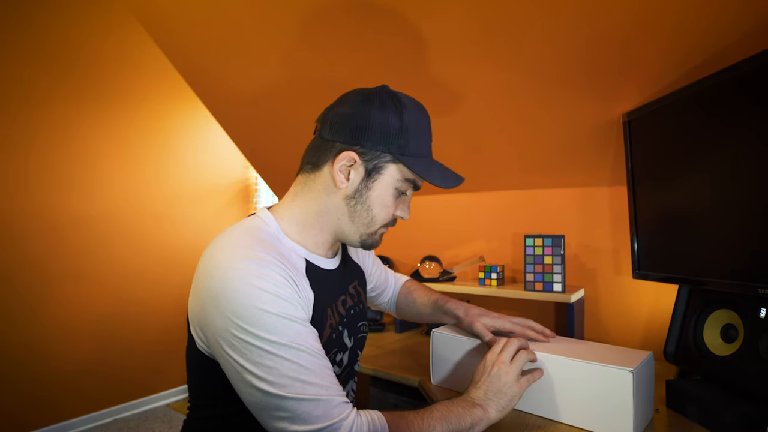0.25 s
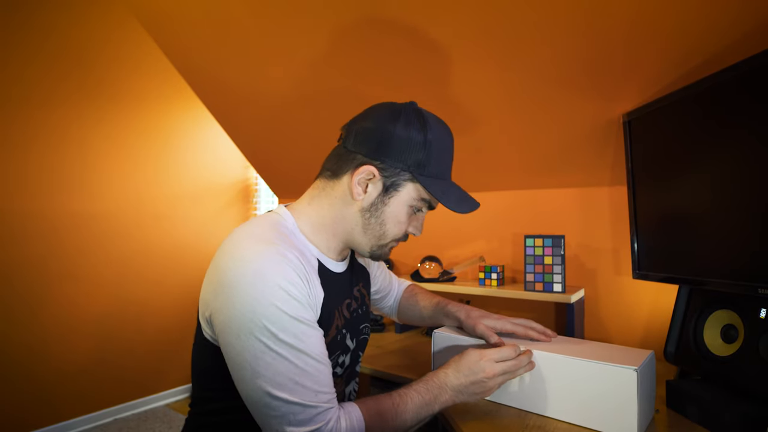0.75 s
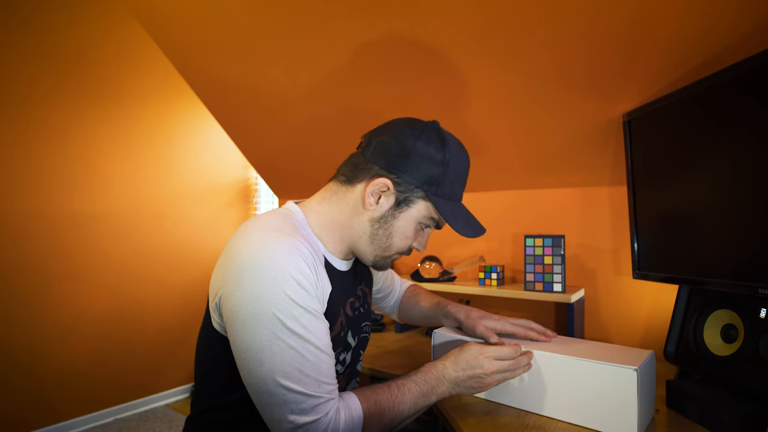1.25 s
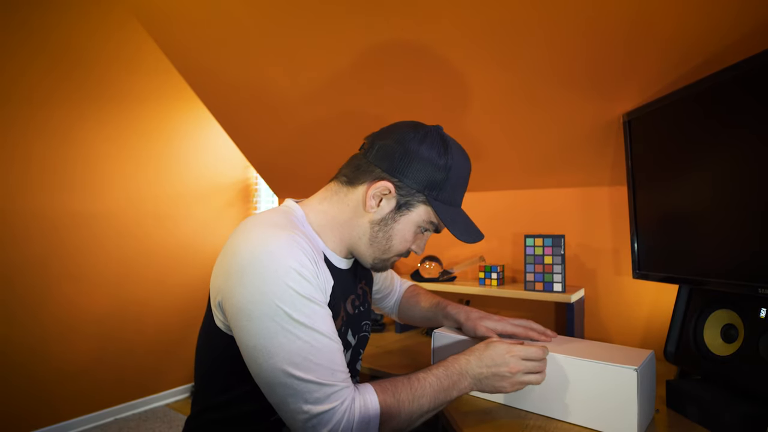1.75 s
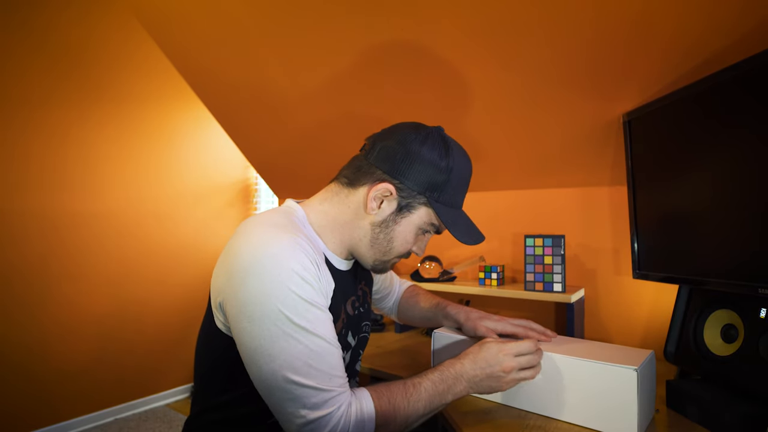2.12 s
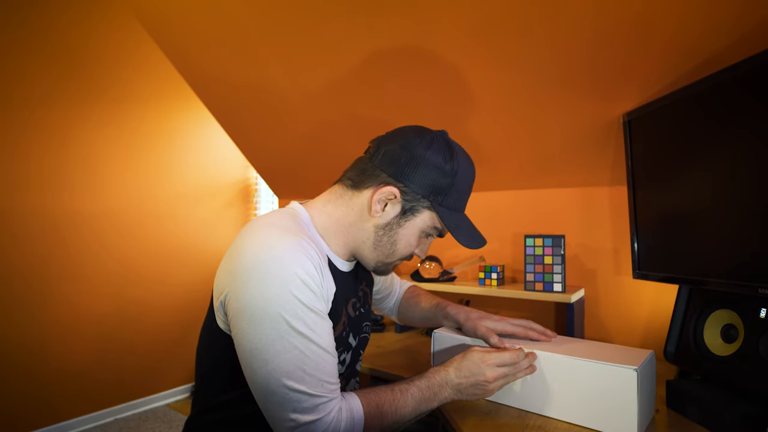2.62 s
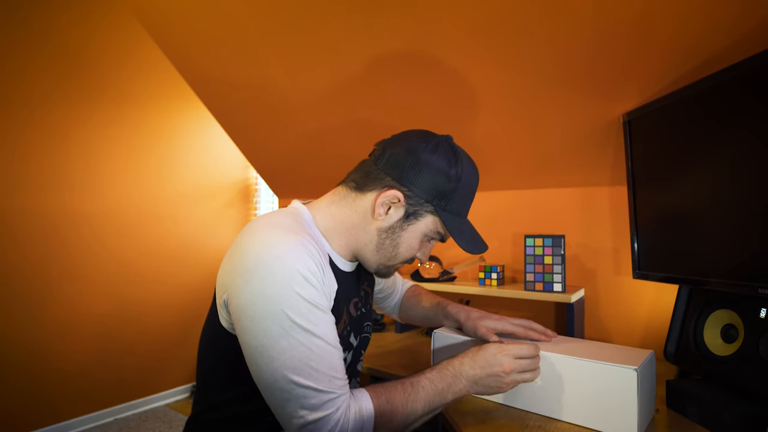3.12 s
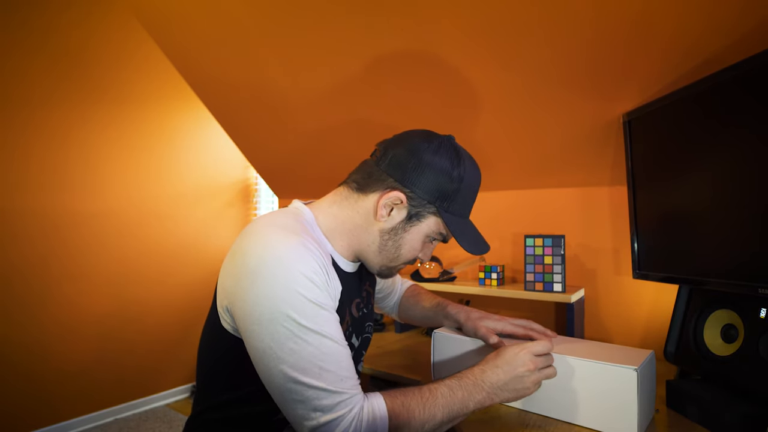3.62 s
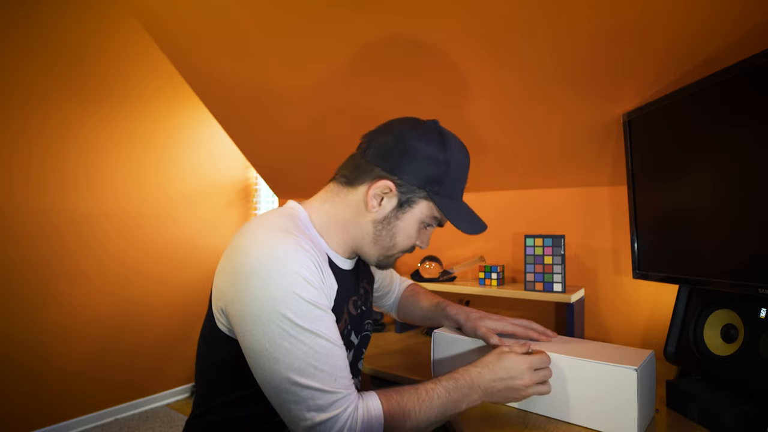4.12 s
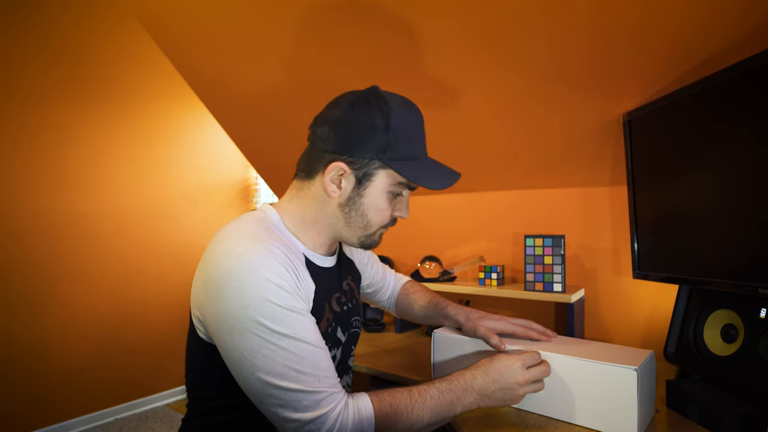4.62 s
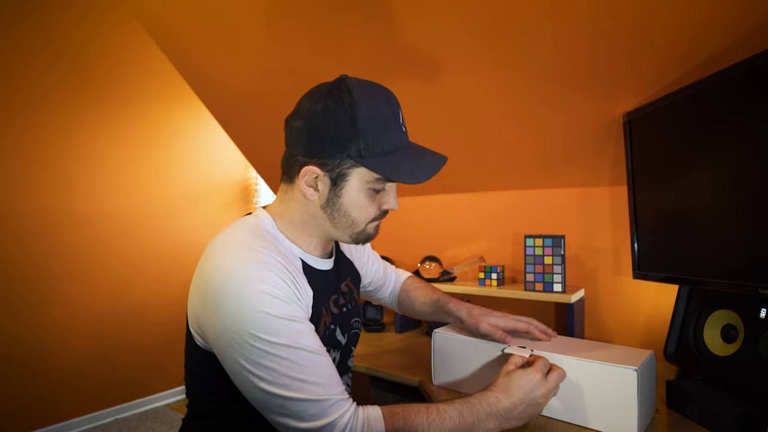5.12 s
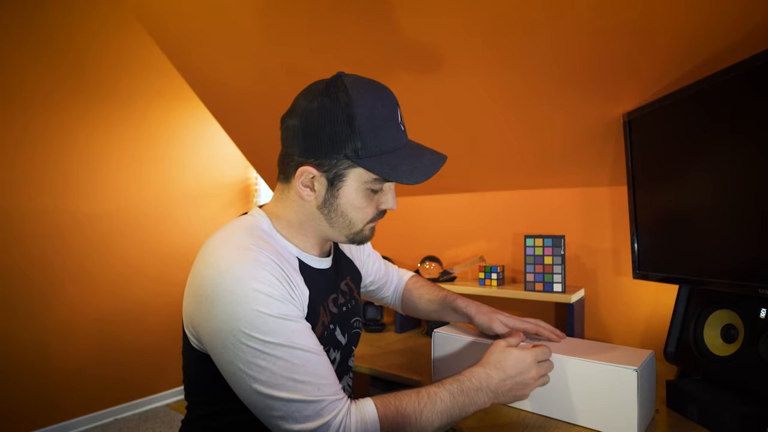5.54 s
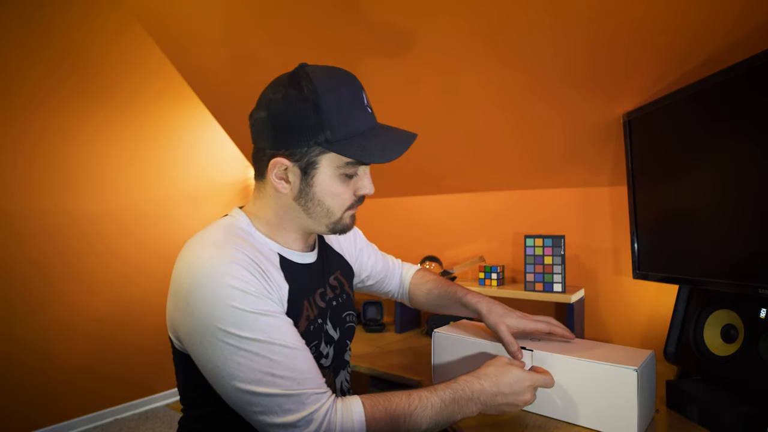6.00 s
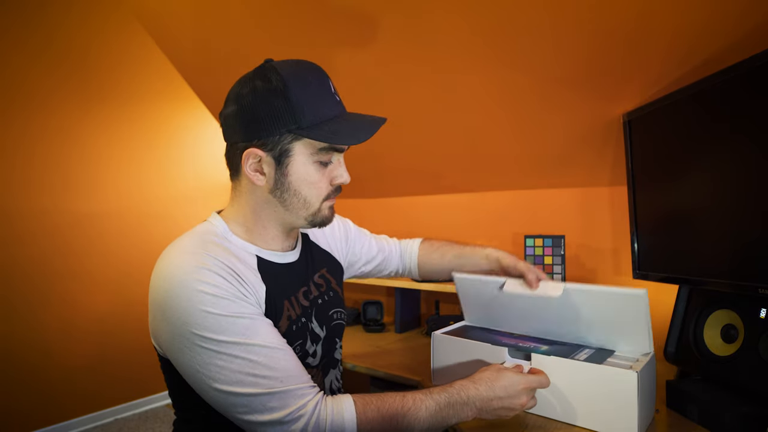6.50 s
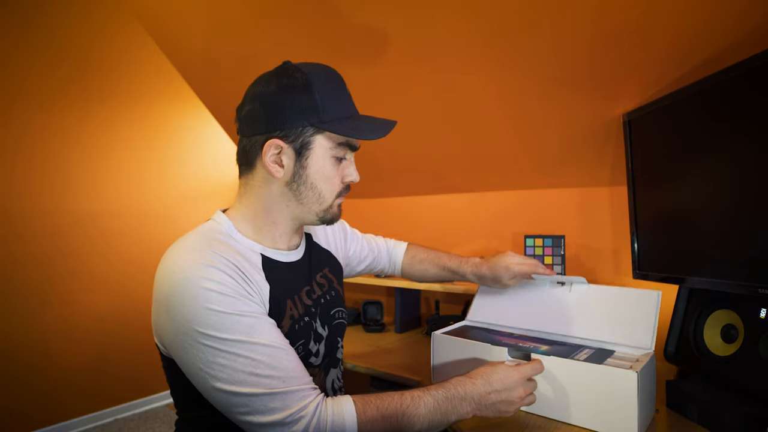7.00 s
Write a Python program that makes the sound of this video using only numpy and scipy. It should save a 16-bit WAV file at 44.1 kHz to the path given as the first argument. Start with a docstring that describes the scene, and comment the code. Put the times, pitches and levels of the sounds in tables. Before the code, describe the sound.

Fingernails pick and scratch at a cardboard box flap with irregular sharp clicks and knocks, then the lid lifts with papery scrapes in a small room.

```python
"""Fingernails pick at the flap of a cardboard box in a small dry room, then hands pull the tab and lift the lid.
Each contact is a burst of jerks filtered by nail and card (snap) and panel modes (knock), plus a hollow thump.
Dragging fingers hiss on the card and keep the box modes stirring; the box also rocks in low wobbles.
Behind them: echoes from sparse decaying taps, low air noise and steady coloured background noise."""
import sys
import numpy as np
from scipy import signal
from scipy.io import wavfile
from scipy.ndimage import uniform_filter1d

SR = 44100
rng = np.random.default_rng(int(sys.argv[2]) if len(sys.argv) > 2 else 0)


def materialize(psi):
    """Save the field psi as 16-bit PCM at rate SR to the path in sys.argv[1].

    A 1-D psi becomes a single channel; in a 2-D psi each row is a channel.
    """
    bounded = np.clip(np.atleast_2d(psi).T, -1, 1)
    quanta = np.round(bounded * 32767).astype(np.int16)
    wavfile.write(sys.argv[1], SR, quanta)


N = 320329

# Sudden slips: start_s, knock_db, knock_hz (favoured panel pitch), thump_db, snap_db, snap_hz, length_ms
SLIPS = [(0.327, -26, 723, -38.5, -23.5, 5300, 13), (0.352, 2.5, 797, -35.5, -43, 2885, 1.7),
         (0.355, -5, 700, -38, -51, 2880, 1.8), (0.431, 13, 404, -7, 10, 2246, 2),
         (0.502, 1, 644, -28, -6, 3640, 2.9), (0.577, -21, 404, -29, -45, 2630, 2.3),
         (1.271, -18, 1200, -39, -19.5, 5330, 2.65), (1.5885, -5.5, 1130, -38, 7.5, 5300, 2.8),
         (1.634, -15.5, 345, -32.5, -13, 2710, 12), (1.842, -14.5, 645, -59, -15.5, 6850, 14),
         (1.887, -26, 684, -71, -23, 6400, 3.1), (2.044, 13, 500, -53.5, 8.5, 5250, 4.5),
         (2.217, -11.5, 500, -52, -15.5, 4040, 7.9), (2.249, -16, 1010, -39, -22.5, 5670, 7.9),
         (2.274, -8, 1180, -35, -14, 3170, 22), (2.543, -38, 645, -59, -25, 3200, 9.5),
         (2.665, -7.5, 992, -36, -11, 4000, 8.2), (2.769, -7.5, 410, -29, -22.5, 3160, 8.3),
         (3.043, -3, 1130, -34, 10, 3360, 2.6), (3.092, 5.5, 790, -10, 0, 4570, 3.1),
         (3.266, -9.5, 337, -25.5, -26, 5800, 14), (3.384, -14, 1130, -48.5, 3.5, 5150, 4.1),
         (3.62, -22.5, 395, -30.5, -45, 5100, 2), (3.675, -12, 463, -25, -46.5, 5060, 1.6),
         (3.82, 10.5, 1106, -23, 12, 3610, 2.6), (4.035, -8.5, 487, -37, -16, 3620, 6.9),
         (4.142, -39.5, 1190, -48, -17, 3550, 26), (4.149, -47, 1000, -58, -27.5, 11000, 8),
         (4.229, -3.5, 395, -30.5, -16, 3680, 44), (4.462, 1.5, 334, -31, -14, 3610, 20),
         (4.485, 5.5, 550, -41.5, -22, 6000, 4.1), (4.595, -14.5, 620, -32, -8, 4600, 4.6),
         (4.633, -40, 528, -45, -6, 6000, 5), (4.664, -0.5, 1050, -25.5, 2.5, 4670, 6.3),
         (4.6915, 2, 550, -29, 6.5, 4800, 4.5), (4.943, -65, 307, -44.5, -20, 4800, 6.2),
         (5.08, -14, 1170, -51, -29, 3620, 7.1), (5.155, -12.5, 404, -35.5, -35, 3270, 8.9),
         (5.226, -16, 700, -52, -15, 3700, 4), (5.238, -11, 700, -53.5, -17, 4800, 3.5),
         (5.315, 12, 844, -33, 10.5, 3470, 6.6), (5.399, -7, 570, -28.5, -13.5, 2730, 3.6),
         (5.462, -11.5, 1180, -53, -9.5, 3700, 14), (5.572, 0.3, 1130, -24, -4, 3270, 4.5),
         (5.613, -5, 334, -23, -16, 4150, 3.9), (5.642, -5.5, 336, -29, -34.5, 3170, 3.9),
         (5.688, 2.5, 384, -21, -2.5, 4030, 4.4), (6.248, -6, 413, -38.5, -21, 3640, 1.1),
         (6.486, 8, 470, -11, -4, 4560, 2.4), (6.541, -14, 430, -29.5, -17.5, 3530, 3.6),
         (6.785, -17, 249, -46, -27, 3800, 2.2), (6.92, 6, 272, -16.5, -2.5, 2520, 9.3),
         (6.954, -16, 260, -16.5, -11.5, 2500, 6.9), (7.036, -15, 270, -21, -25, 7150, 7.2),
         (7.093, -5.5, 1800, -34, -3, 2460, 19), (7.121, -16, 1920, -31, -28, 4690, 6.6),
         (7.201, -32, 900, -64, -6, 4760, 3.7), (7.243, -3, 725, -25, 3.5, 3560, 7)]
# Short scuffs that swell before letting go: start_s, knock_db, knock_hz, thump_db, snap_db, snap_hz, length_ms
SCUFFS = [(0.131, -24, 336, -26.5, -30, 7600, 9.2), (0.428, 10, 413, -17, 8.5, 2660, 2.2),
          (0.713, -18.5, 623, -36.5, -31, 5420, 6.9), (0.93, -15, 1540, -43.5, -9.5, 4600, 7.6),
          (1.112, -22, 300, -36, -31, 5800, 9.5), (1.382, -25.5, 391, -50, -25.5, 6180, 9.4),
          (2.191, -21, 680, -61.5, -21.5, 5330, 2.9), (3.085, 10, 800, -17.5, 7, 4700, 4),
          (3.336, -14, 1300, -43, -21, 5130, 29), (4.255, 3, 880, -50, -3, 3400, 5),
          (4.493, 2.5, 544, -27, -4, 9000, 2.7), (5.092, -6.5, 1190, -46, -19, 3630, 3.6),
          (5.255, 0, 690, -47, -4.5, 4500, 2.6), (5.482, -14.5, 1200, -54, -12, 3700, 7.7),
          (5.528, -25, 1700, -62, -11.5, 3900, 14), (5.774, 0.5, 960, -27.5, -5.5, 3570, 3.8),
          (5.859, -7, 665, -32, -9, 3300, 25), (6.911, -14, 700, -38, -14, 4000, 3),
          (6.937, -28, 328, -15, -4.5, 6100, 5.2)]
# Even strokes of a finger, equally long: start_s, knock_db, knock_hz, thump_db, snap_db, snap_hz
STROKES = [(0.047, -19.5, 1200, -67, -23, 3780), (0.6, -22, 554, -34.5, -21.5, 7100),
           (1.011, -26, 1490, -62.5, -33.5, 5150), (1.139, -20.5, 1307, -44.5, -24, 5630),
           (2.393, -16, 970, -60, -24, 4570), (2.91, -25, 1300, -61, -36, 2020),
           (3.275, -19, 1350, -47, -32, 5980), (4.275, -51.5, 463, -33, -11.5, 3440),
           (5.18, -46, 500, -53, -10, 4300), (5.984, -41, 751, -57, -9, 8300),
           (6.056, -45.5, 1030, -38, -8, 3700), (6.282, -13, 1500, -40, -17, 5340),
           (6.385, -11.5, 1540, -57, -9, 3530), (6.858, -12.5, 1970, -61.5, -11, 2820),
           (7.082, 1.5, 1740, -42, -5, 3160), (7.194, -34, 762, -40, -1.5, 2570)]
STROKE_MS, SCUFF_ROUND = 45.3, 1.3  # roundness above 1: softer start
# Ring of the nail tip by kind of contact: peak_db, half_width_hz
NAIL_RING = {"slip": (9.24, 450), "scuff": (9.6, 320), "stroke": (11, 280)}
# Modes of the box hollow: mode_hz, relative_level_db, t60_s
HOLLOW_MODES = [(69, -6.5, 0.046), (94, -10.5, 0.12), (150.1, 9, 0.079), (208.7, 1, 0.039)]
# Modes of the card panels: mode_hz, relative_level_db, t60_s
PANEL_MODES = [(235, 6, 0.067), (345, -10.5, 0.2), (430, -6.5, 0.11), (493, -12.5, 0.034),
               (642, 0.5, 0.034), (720, -6, 0.068), (974, -0.5, 0.023), (1130, 2, 0.025),
               (1300, -2.5, 0.017), (1385, -6, 0.091), (1692, -6, 0.084), (2238, -4.5, 0.042)]
# Bright spectrum of card: freq_hz, relative_density_db
CARD_SPECTRUM = [(880, -55), (1500, -9), (1940, -10.5), (2230, -8), (2880, -9), (3220, -6.5), (4640, -7),
                 (5770, -7.5), (10500, -15), (14100, -29), (16000, -39)]
SLIP_SPOT_DB_PER_OCT, RUB_SPOT_DB_PER_OCT, DRAG_SPOT_DB_PER_OCT = 9.5, 16, 20  # fall off favoured pitch
HAND_DAMPING = 0.6  # share of panel t60 left by the hand
LID_UP_S, OPEN_PITCH_RATIO = 6.7, 0.59  # the hollow thumps lower with the lid up

# Drags of fingers: peak_s, swell_s, dying_s, hiss_db, panels_db, hollow_db, fineness_db_per_oct, spot_hz
DRAGS = [(0.15, 0.059, 0.2, -56, -49.5, -47.5, 9.5, 800), (0.426, 0.024, 0.022, -50, -42, -51, -9, 910),
         (0.499, 0.16, 0.16, -64, -45, -34.5, -3, 470), (1.157, 0.15, 0.11, -73, -62, -56, -4, 954),
         (1.277, 0.021, 0.024, -80, -47.5, -37.5, -15, 1300), (1.735, 0.15, 0.13, -60.5, -49, -60, -4, 690),
         (2.035, 0.037, 0.3, -60.5, -53, -61.5, 3.5, 1000), (2.279, 0.15, 0.042, -55.5, -53, -43.5, 1, 800),
         (2.434, 0.074, 0.046, -60.5, -57.5, -45.5, 3, 895),
         (2.696, 0.042, 0.07, -61.5, -67, -44, 2.5, 850), (2.763, 0.039, 0.03, -56, -53, -43, 1, 665),
         (2.933, 0.12, 0.1, -70.5, -60.5, -52, -3, 1280), (3.073, 0.04, 0.14, -51.5, -45.5, -60, -3, 950),
         (3.38, 0.13, 0.88, -77, -62, -76, -5, 1260), (3.911, 0.21, 0.34, -59.5, -51, -64, -3, 970),
         (4.155, 0.026, 0.14, -70, -53, -78, 4, 870), (4.263, 0.072, 0.2, -50.5, -52, -46, -2, 840),
         (4.492, 0.014, 0.057, -38, -33, -38, 5.5, 800), (4.61, 0.05, 0.027, -48.5, -37, -49, 3, 720),
         (4.676, 0.13, 0.12, -44, -47.5, -64, 4, 645), (5.19, 0.073, 0.052, -55, -39.5, -38, -3.5, 490),
         (5.249, 0.045, 0.069, -37, -35.5, -57, -2, 720), (5.39, 0.37, 0.071, -54.5, -52, -44, -6.5, 850),
         (5.5, 0.029, 0.25, -52, -56, -59, -6, 860), (5.607, 0.067, 0.1, -55.5, -38, -60, -6, 765),
         (5.787, 0.091, 0.48, -50.5, -46, -43, -2, 820), (6.088, 0.048, 0.052, -58.5, -73, -43, 4, 657.3),
         (6.331, 0.083, 0.16, -54, -40.5, -58, -3.5, 700), (6.433, 0.072, 0.11, -36.5, -43, -49, -0.2, 590),
         (6.498, 0.028, 0.035, -54, -40, -31, 15.5, 583), (6.6, 0.13, 0.049, -52, -75, -65, 7.5, 542),
         (6.798, 0.048, 0.16, -54.5, -49.5, -57, 9.5, 760), (6.936, 0.14, 0.52, -46, -49.5, -44, 8, 980),
         (7.109, 0.091, 0.14, -42.5, -44, -55, 1.5, 1260), (7.239, 0.039, 0.011, -32, -32.5, -57, 1, 930)]
DRAG_DEPTH_DB, DRAG_ROUND = 20, 1.52  # fall over one swell or dying time; above 1: round top, quick end
# Hands resting and shifting between drags: time_s, hiss_db
REST_HISS = [(0.0, -68), (0.35, -77), (0.66, -90), (0.78, -104), (1.33, -81.5), (1.56, -75), (2.6, -76),
             (3.6, -69.5), (4.3, -76.5), (4.44, -77), (4.5, -52), (4.85, -69), (5.06, -81), (5.9, -69),
             (6.2, -90.5), (6.55, -56), (6.75, -112.5), (6.82, -60), (7.05, -62), (7.26, -56)]
REST_PANELS_DB, REST_HOLLOW_DB = 3.5, 10  # relative to the resting hiss
REST_FINE_DB_PER_OCT, REST_SPOT_HZ = 6.7, 800
HISS_PATCHY_DB, CATCH_DB, WANDER_OCT = 2.4, 2.6, 0.17

# Rocking of the box: start_s, level_db
BUMPS = [(0.445, -13), (0.474, -24), (0.515, -15), (0.576, -30), (0.63, -28.5), (2.046, -18.5),
         (4.257, -24.5), (4.488, -22), (6.485, -22.5), (6.985, -21)]
BUMP_HZ, BUMP_T60_S = 89.5, 0.054
# Decay of the room: freq_hz, t60_s
ROOM_DECAY = [(100, 0.023), (300, 0.2), (800, 0.16), (2000, 0.18), (5000, 0.15), (12000, 0.16)]
ROOM_DB, ECHO_PATTERNS = -10.0, 3
# Air moved by the arms and the lid: time_s, level_db
SWAY_LEVEL = [(0.0, -64.5), (0.46, -37), (0.91, -65), (2.12, -50), (2.2, -59.5), (4.14, -64), (4.29, -45),
              (5.09, -73), (5.22, -53), (6.14, -65.5), (6.399, -51), (6.652, -47), (6.771, -54.5),
              (6.8, -36), (6.9, -35.5), (7.26, -57)]
# Spectrum of the background noise: freq_hz, relative_density_db
BACKGROUND_SPECTRUM = [(15, -40.5), (25, 5), (64, 0.5), (92, -11.5), (463, -19.5), (659, -13), (840, -24),
                       (2910, -23), (3620, -21.5), (3920, -30.5), (4370, -19.5), (5880, -11), (6380, -30.5),
                       (10100, -19.5), (12300, -19.5), (16000, -41.5)]
BACKGROUND_DB = -64.5
EDGE_HZ = 16050


def hands():
    """All slips, scuffs and strokes: the direct sound and the sound sent to the walls."""
    near, far = np.zeros((2, N))
    for rows, kind in (SLIPS, "slip"), (SCUFFS, "scuff"), (STROKES, "stroke"):
        for row in rows:
            start_s, *settings = row
            if kind == "stroke":
                settings.append(STROKE_MS)
            direct, sent = contact(start_s, *settings, kind)
            add(near, start_s + 0.001, direct)
            add(far, start_s + 0.003, sent)
    return near, far


def contact(start_s, knock_db, knock_hz, thump_db, snap_db, snap_hz, length_ms, kind):
    """Uneven jerks drive card and panels; the softer push behind them drives the hollow."""
    jerks = contact_jerks(length_ms, kind)
    snap, wall_snap = nail_snap(snap_db, snap_hz, kind)
    knock = panel_knock(knock_db, knock_hz, kind)
    near = hollow_thump(thump_db, start_s > LID_UP_S)
    far = near.copy()
    add(near, 0, signal.fftconvolve(jerks, knock)[:len(near)])
    add(near, 0, signal.fftconvolve(jerks, snap))
    # except for strokes, one plain tick feeds the echo, giving a smooth tail
    spread = jerks if kind == "stroke" else np.ones(1)
    add(far, 0, signal.fftconvolve(spread, knock)[:6000])
    add(far, 0, signal.fftconvolve(spread, wall_snap))
    return near, far


def contact_jerks(length_ms, kind):
    """Random jerks under an envelope: slips decay, scuffs swell, strokes stay level and stop abruptly."""
    jerk, size = rng.standard_normal((2, 3200))
    t = np.arange(len(jerk)) / SR
    u = t / (max(length_ms, 0.3) / 1000)
    if kind == "slip":
        shape = np.minimum(t / 0.00019, 1) * np.exp(-u ** 1.3)
    elif kind == "scuff":
        shape = (u * np.exp(1 - u)) ** SCUFF_ROUND
    else:
        shape = np.minimum(t / 0.0061, 1) * np.exp(-u ** 8)
    jerks = jerk * gain_of(size) * shape
    if kind == "slip":  # the first release is the firmest
        jerks += 1.22 * np.exp(-((t - 0.0006) / 0.0001) ** 2)
    return jerks / np.linalg.norm(jerks)


def nail_snap(snap_db, snap_hz, kind):
    """Card spectrum with a nail resonance, aimed forward so the walls hear less of the ring."""
    hz = np.fft.rfftfreq(1024, 1 / SR)
    peak_db, half_width_hz = NAIL_RING[kind]
    nail_db = peak_db - 10 * np.log10(1 + ((hz - snap_hz) / half_width_hz) ** 2)
    nail_db = np.maximum(nail_db, 0)
    tilt_db_per_oct = 3.2 * np.log2(snap_hz / 4200)  # thinner edges are brighter
    card_db = read(CARD_SPECTRUM, hz) + tilt_db_per_oct * np.log2((hz + 500) / 5000)
    snaps = causal(card_db + nail_db), causal(card_db + nail_db / 2)
    return [v * gain_of(snap_db) / np.linalg.norm(v) for v in snaps]


def panel_knock(knock_db, knock_hz, kind):
    """Each spot of contact favours panel modes near one pitch and bends the panels a little."""
    fall_db = SLIP_SPOT_DB_PER_OCT if kind == "slip" else RUB_SPOT_DB_PER_OCT
    modes = []
    for hz, db, t60_s in PANEL_MODES:
        bend, lift = rng.standard_normal(2)
        mode_db = db + 2.6 * lift - fall_db * abs(np.log2(hz / knock_hz))
        modes.append((hz * (1 + 0.055 * bend), mode_db, HAND_DAMPING * t60_s))
    high = signal.butter(2, 220, "high", fs=SR, output="sos")  # the knock carries no deep bass
    knock = signal.sosfilt(high, ring(modes))
    return knock * gain_of(knock_db) / np.linalg.norm(knock)


def hollow_thump(thump_db, lid_up):
    """A push moves the wall and lets it come back, exciting the hollow modes."""
    contact_s = 0.00062 * gain_of(0.093 * (thump_db + 33))  # heavier blows stay longer in contact
    slow = np.arange(3200) / SR / contact_s
    push = np.gradient(slow * np.exp(-slow))
    pitch = OPEN_PITCH_RATIO if lid_up else 1
    modes = [(hz * pitch, db, t60_s) for hz, db, t60_s in HOLLOW_MODES]
    thump = signal.fftconvolve(push, ring(modes))
    return thump * gain_of(thump_db) / abs(thump).max()


def rub():
    """Dense grit under the fingers makes a hiss and keeps the box modes stirring."""
    t = np.arange(N) / SR
    control_s = t[::64]
    *gains, fine, spot_hz = touch(control_s)
    hiss_gain, panels_gain, hollow_gain = (np.interp(t, control_s, v) for v in gains)
    out = skin_hiss(control_s, fine) * hiss_gain
    pressure = gain_of(2.4 * evened(uniform_filter1d(rng.standard_normal((2, N)), 500)))  # uneven
    panel_drive, hollow_drive = rng.standard_normal((2, N)) * pressure
    hollow = np.gradient(ring(HOLLOW_MODES))
    out += signal.oaconvolve(hollow_drive * hollow_gain, hollow / np.linalg.norm(hollow))[:N]
    return out + stirred_panels(panel_drive * panels_gain, spot_hz)


def touch(t):
    """Power sums of drags and rest for hiss, panels and hollow; power-weighted means set the colour."""
    peak_s, swell_s, dying_s, *levels_db, fine, spot_hz = np.transpose(DRAGS)[:, :, None]
    distance = np.maximum((peak_s - t) / swell_s, (t - peak_s) / dying_s)
    shape_db = -DRAG_DEPTH_DB * distance ** DRAG_ROUND
    rest_db = np.interp(t, *np.transpose(REST_HISS))
    powers = []
    for level_db, offset_db in zip(levels_db, (0, REST_PANELS_DB, REST_HOLLOW_DB)):
        powers.append(gain_of(np.vstack([level_db + shape_db, rest_db + offset_db])) ** 2)
    hiss, panels, _ = powers
    fine = np.append(fine, REST_FINE_DB_PER_OCT) @ hiss / hiss.sum(axis=0)
    log_spot = np.log(np.append(spot_hz, REST_SPOT_HZ)) @ panels / panels.sum(axis=0)
    return *(np.sqrt(p.sum(axis=0)) for p in powers), fine, np.exp(log_spot)


def skin_hiss(control_s, fine):
    """Card-coloured noise, roughened by tiny catches, sparse ticks and fingers that stick and let go."""
    def colour_db(hz, t):
        tilt_db_per_oct = np.interp(t, control_s, fine)
        return read(CARD_SPECTRUM, hz) + tilt_db_per_oct * np.log2((hz + 500) / 5500)

    grit = gain_of(1.4 * evened(uniform_filter1d(rng.standard_normal(N), 150)))
    ticks = (rng.random(N) < 150 / SR) * rng.exponential(0.45, N)  # 150 ticks/s on average
    grit += signal.oaconvolve(ticks, np.exp(-np.arange(200) / 35))[:N]
    return noise(colour_db, HISS_PATCHY_DB) * grit * gain_of(CATCH_DB * drift(400))


def stirred_panels(drive, spot_hz):
    """Noise rings each panel mode, shared out by its distance from the roaming rubbed spot."""
    spot_hz = spot_hz * 2 ** (WANDER_OCT * drift(1500)[::64])
    shares = gain_of([db - DRAG_SPOT_DB_PER_OCT * abs(np.log2(hz / spot_hz)) for hz, db, _ in PANEL_MODES])
    shares /= np.linalg.norm(shares, axis=0)
    out = np.zeros(N)
    for (hz, _, t60_s), share in zip(PANEL_MODES, shares):
        mode = ring([(hz, 0, t60_s)])
        mode_drive = drive * np.repeat(share, 64)[:N]
        out += signal.oaconvolve(mode_drive, mode[:3000] / np.linalg.norm(mode))[:N]
    return out


def bumps():
    """The whole box rocks on the table: a short low decaying sine."""
    out = np.zeros(N)
    wobble = ring([(BUMP_HZ, 0, BUMP_T60_S)])
    wobble *= np.minimum(np.arange(len(wobble)) / SR / 0.0016, 1)
    for start_s, level_db in BUMPS:
        add(out, start_s, gain_of(level_db) * wobble)
    return out


def room(x):
    """Sparse taps of random sign swell as the far walls answer, each band dying at its own speed."""
    out, slots = np.zeros(N), np.arange(100, SR // 2 - 20, 20)
    t = np.arange(N) / SR
    for k in range(ECHO_PATTERNS):  # the echo slowly rotates among several random tap patterns
        taps = np.zeros(SR // 2)
        taps[slots + rng.integers(0, 20, len(slots))] = rng.choice([-1., 1.], len(slots))
        hz, frame_s, z = signal.stft(taps, SR, nperseg=256)
        decay_db = -60 * frame_s / read(ROOM_DECAY, hz)[:, None]
        tail = signal.istft(z * gain_of(decay_db), SR, nperseg=256)[1]
        tail *= np.clip(np.arange(len(tail)) / SR / 0.055, 0.35, 1)
        share = np.sqrt(2 / ECHO_PATTERNS) * np.cos(np.pi * (1.3 * t + k / ECHO_PATTERNS))
        out += signal.oaconvolve(x * share, tail / np.linalg.norm(tail))[:N]
    return out


def sway():
    """Slow air pressure at the microphone: low band noise under a level curve."""
    low = signal.butter(2, [25, 52], "band", fs=SR, output="sos")
    level_db = np.interp(np.arange(N) / SR, *np.transpose(SWAY_LEVEL))
    return evened(signal.sosfilt(low, rng.standard_normal(N))) * gain_of(level_db)


def background():
    """Steady coloured background noise."""
    hush = noise(lambda hz, t: read(BACKGROUND_SPECTRUM, hz), patchy_db=1.0, size=1024)
    return gain_of(BACKGROUND_DB) * evened(hush)


def gain_of(db):
    """Decibels to gain."""
    return 10 ** (np.asarray(db) / 20)


def evened(x):
    """Scales to rms 1."""
    return x / np.sqrt(np.mean(x ** 2) + 1e-20)


def drift(size):
    """Slow random curve of rms 1: noise averaged twice over size samples."""
    return evened(uniform_filter1d(uniform_filter1d(rng.standard_normal(N), size), size))


def read(points, hz):
    """Interpolates a table on a log-frequency axis."""
    f, value = np.transpose(points)
    return np.interp(np.log(hz + 1), np.log(f + 1), value)


def add(mix, start_s, sound):
    """Mixes a sound in at a time, cut at the end of the mix."""
    part = mix[round(start_s * SR):][:len(sound)]
    part += sound[:len(part)]


def ring(modes):
    """Sum of decaying sines: the answer of modes to one tick."""
    t = np.arange(6000) / SR
    return sum(gain_of(db - 60 * t / t60_s) * np.sin(2 * np.pi * hz * t) for hz, db, t60_s in modes)


def causal(db):
    """Minimum-phase tick with the colour db (zero to half the rate)."""
    mirrored_db = np.r_[db, db[-2:0:-1]]
    log_gain = np.log(gain_of(np.maximum(mirrored_db, -100)))
    return np.fft.ifft(np.exp(np.conj(signal.hilbert(log_gain)))).real[:len(db)]


def noise(db, patchy_db, size=256):
    """Random short-time spectra of magnitude db(hz, t), with drifting patches."""
    hz = np.fft.rfftfreq(size, 1 / SR)[:, None]
    t = np.arange(4 * N // size + 5) * size / 4 / SR
    a, b, patches = rng.standard_normal((3, len(hz), len(t)))
    patches = uniform_filter1d(patches, size=3, axis=0)
    patches = evened(uniform_filter1d(patches, size=40, axis=1))
    z = (a + 1j * b) * gain_of(db(hz, t) + patchy_db * patches)
    return signal.istft(z, nperseg=size, noverlap=3 * size // 4)[1][:N]


def scene():
    """Box, echoes, air and background noise at one microphone."""
    near, far = hands()
    rubbing = rub()
    box = near + rubbing + bumps()
    echoes = gain_of(ROOM_DB) * room(far + rubbing)
    return (box + echoes + sway() + background())[None]


def record(dry):
    """Bass cut, expander on the stillest moments, soft ceiling on the loudest snaps, then the band limit."""
    cut = signal.sosfilt(signal.butter(2, 42, "high", fs=SR, output="sos"), dry)
    power_db = 10 * np.log10(abs(uniform_filter1d(cut ** 2, 3000)) + 1e-12)
    expanded = cut * gain_of(-np.clip(0.86 * (-54.5 - power_db), 0, 8))  # at most 8 dB down
    held = 0.97 * np.tanh(expanded / 0.97)
    band = signal.firwin(511, EDGE_HZ, window=("kaiser", 9), fs=SR)
    return signal.oaconvolve(held, band[None], "same")


dry = scene()
out = record(dry)
materialize(out)
```